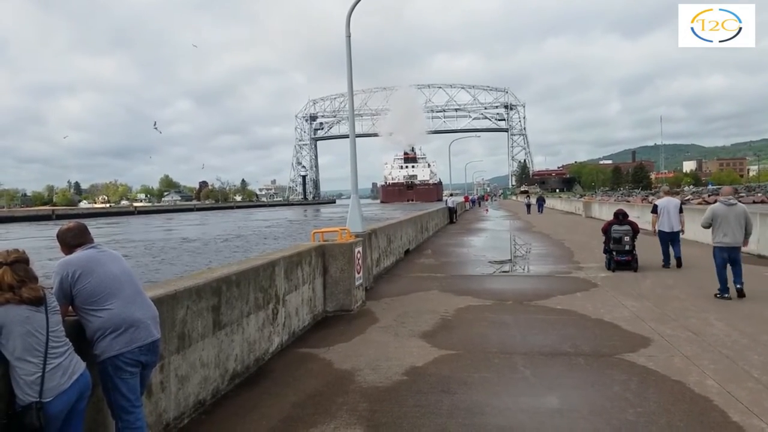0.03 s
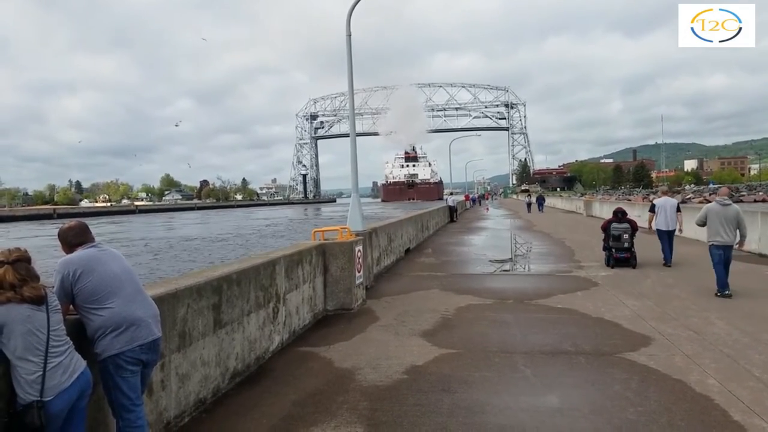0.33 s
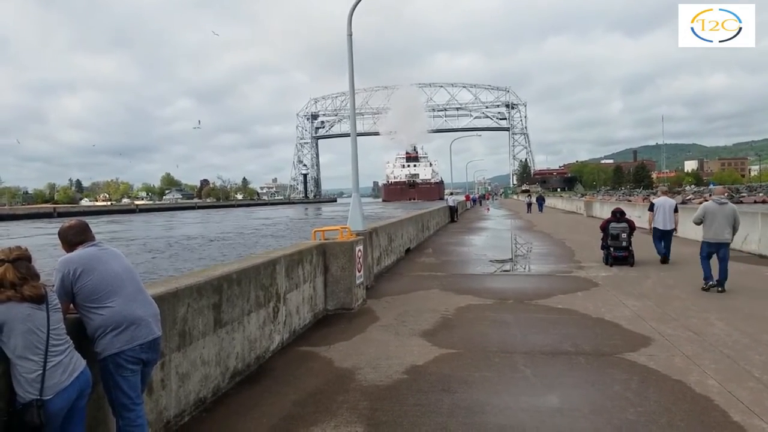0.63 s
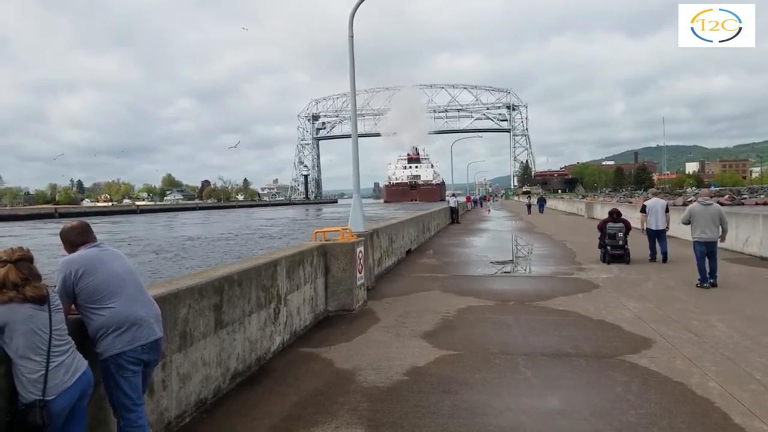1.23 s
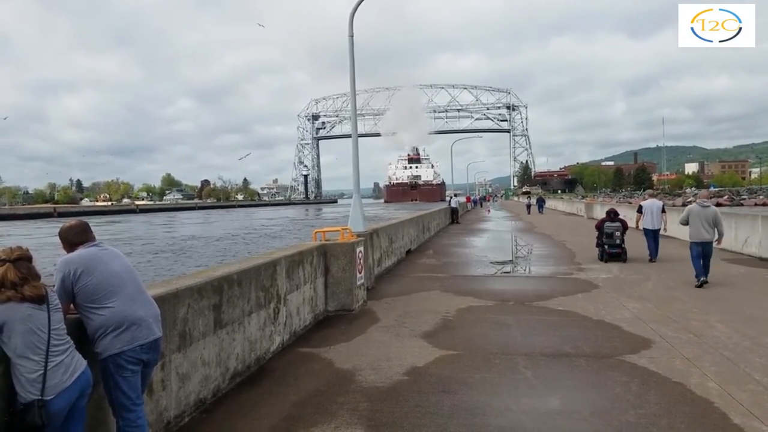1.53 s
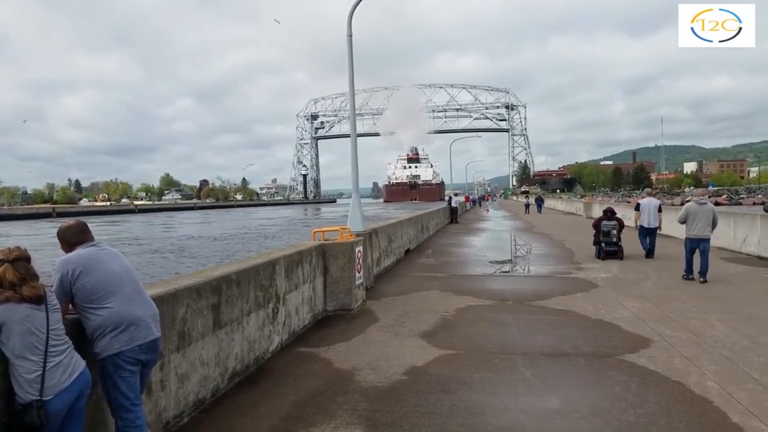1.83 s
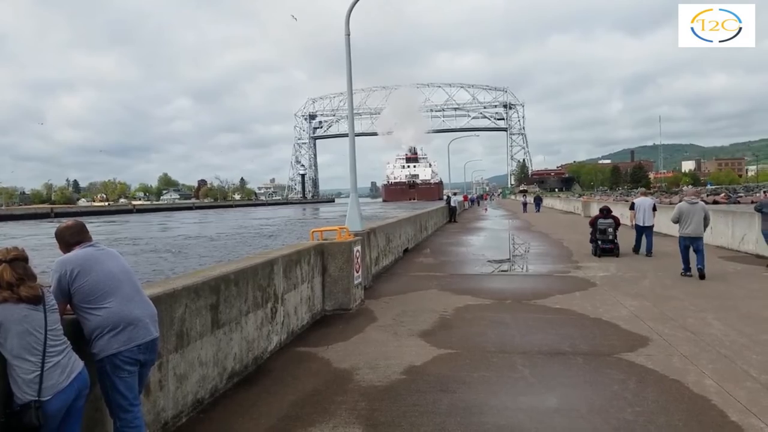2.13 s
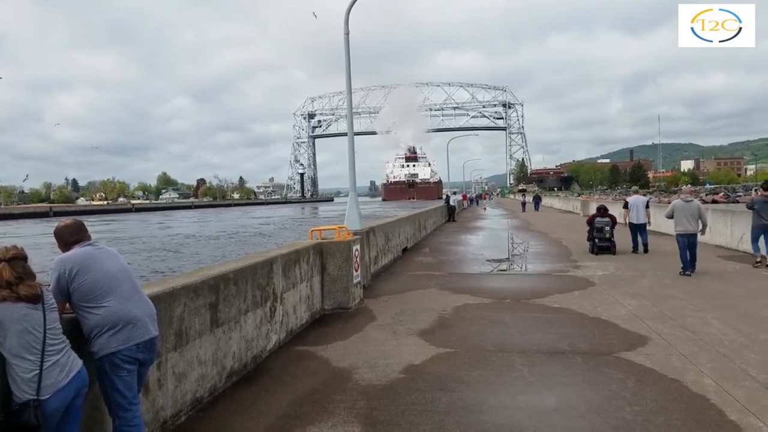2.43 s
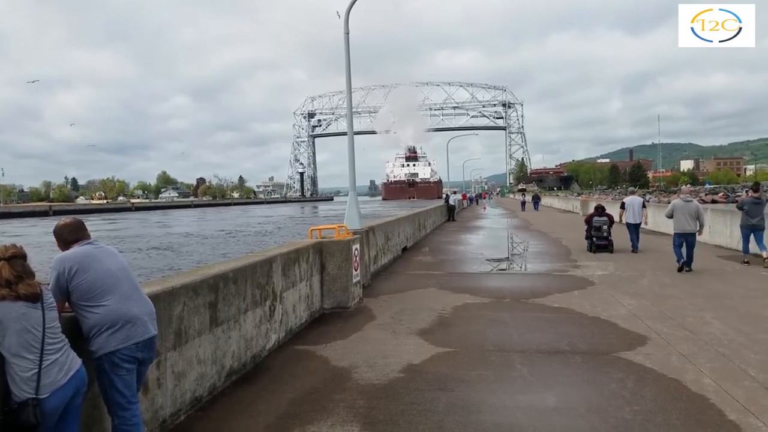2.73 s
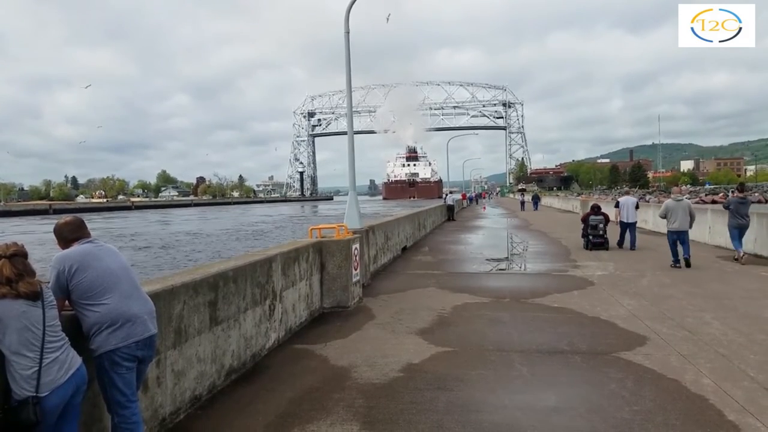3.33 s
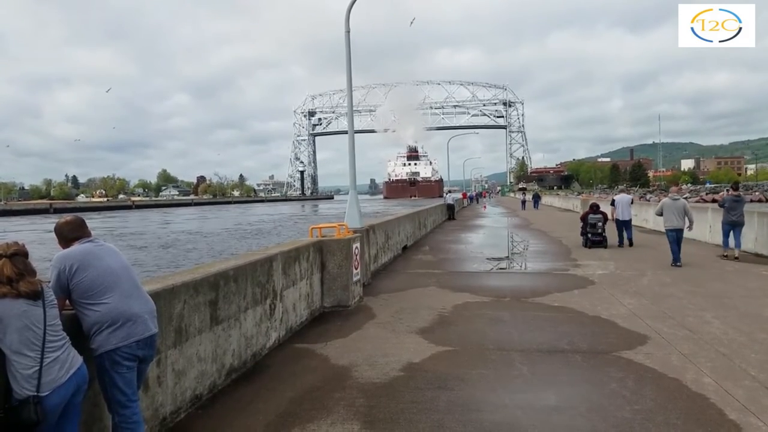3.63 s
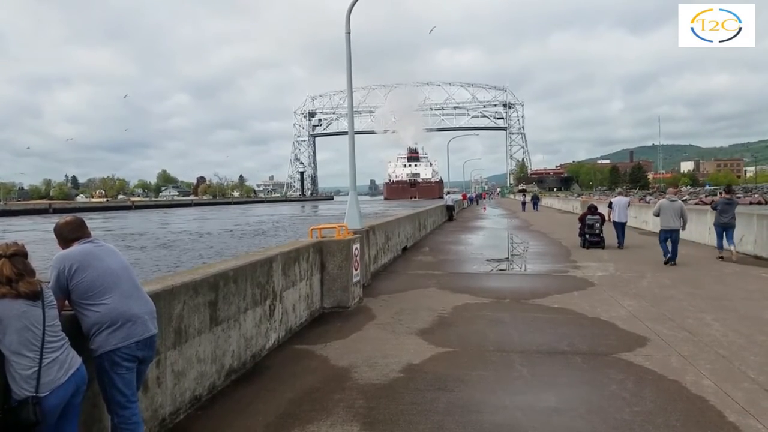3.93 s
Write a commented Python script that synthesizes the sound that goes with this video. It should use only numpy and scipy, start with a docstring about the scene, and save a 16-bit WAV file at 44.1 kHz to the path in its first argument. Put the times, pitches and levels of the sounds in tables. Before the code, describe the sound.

A large ship's horn is the main sound, heard from a canal pier. For the first half second there is only faint engine rumble, open-air wash and the distant echo of an earlier blast. At about 0.5 seconds the horn enters sharply with a loud, brassy chord of several tones. It holds steadily to the end, around 4 seconds, throbbing slightly, with rushing air and reverberation off walls and water.

```python
"""Four air horns sound one long, steady chord across a ship canal, heard from a concrete pier.
Each diaphragm starts sharp and settles; the three lower horns beat and mix into sum tones.
Single partials swell and dip, one throbs; walls and water reverberate. Underneath, from the start:
a ship's engine rumble, open-air wash and the distant echo of an earlier blast."""
import sys
import numpy as np
from scipy import signal
from scipy.fft import rfft, irfft, next_fast_len
from scipy.io import wavfile
from scipy.ndimage import uniform_filter1d, minimum_filter1d, map_coordinates

SR = 44100
rng = np.random.default_rng(int(sys.argv[2]) if len(sys.argv) > 2 else 0)


def file_out(sig):
    """Save sig as 16-bit WAV at sys.argv[1]."""
    # one column per channel
    cols = np.atleast_2d(sig).T
    # limit, then scale
    lim = np.clip(cols, -1, 1)
    pcm = np.round(lim * 32767).astype(np.int16)
    wavfile.write(sys.argv[1], SR, pcm)


N = 176400

# horn: start/s, pitch/Hz, initial sharpness/fraction, settling/s, attack/s
HORNS = {"low": (.54, 258.85, 0.02497, 0.05984, 0.12), "second": (.5, 292.55, 0.03498, 0.0598, 0.044),
         "third": (.485, 298.55, .035, .06, .07), "high": (.449, 355.75, .04, .045, .011)}
# horn: level/dB per harmonic, fundamental first
HARMONICS_DB = { "low": [-29, -21.5, -30, -27, -37.5, -23.5, -35, -39.5, -56.5, -42.5, -60, -59], "second":
                [-38.5, -32, -31.5, -34, -34.5, -40, -44.5, -54.5, -49, -54, -60], "third": [-38, -32,
                -24.5, -37.5, -28, -39.5, -34.5, -40, -51, -48.5, -60, -55.5, -53.5, -60.5, -63.5, -62.5,
                -69.5, -65.5], "high": [-24.5, -27.5, -21.5, -23, -30, -31, -32, -43, -43.5, -49.5, -54,
                -48, -50.5, -57.5, -53.5, -54.5, -58, -68, -57.5, -65, -70, -63, -66.5, -73]}
# level curves of single partials, by (horn, harmonic): t/s, gain/dB
# the high horn's third harmonic throbs about twice a second, as in beating with a nearby sum tone
PARTIAL_LEVELS = {("high", 2): [(.6, 4.5), (1.0, 1), (2.4, 0), (3.55, -6), (3.9, 0)],
                  ("high", 3): [(.47, 2.5), (.56, 5.5), (.7, 4), (.9, -5), (1.05, 7), (1.2, -2), (1.37, 7),
                  (1.5, -5), (1.7, 6.5), (1.95, -2.5), (2.2, 5), (2.45, -3.5), (2.7, 2.5), (2.95, -4.5),
                  (3.2, 0.5), (3.9, -3)], ("high", 4): [(.6, 1), (2.1, -1), (3.1, 0), (3.7, 3.5)],
                  ("high", 6): [(.48, -8.5), (.7, 0), (1.8, -1.5), (3.9, 2)], ("high", 1): [(.47, -5.5),
                  (.56, 0.5), (3.9, 0)], ("low", 3): [(.7, -8), (.95, 0.5), (2.0, 1.5), (3.5, -2),
                  (3.7, -6.5)], ("high", 7): [(.48, -2), (.65, 2.5), (1.2, -4), (2.9, 2), (3.3, -3),
                  (3.8, 3)], ("high", 8): [(.5, 8), (.8, -0.5), (1.1, -7), (2.0, -1), (3.9, 7)],
                  ("high", 12): [(.5, -4.5), (.7, 1), (3.9, 0.5)], ("low", 6): [(.64, -13), (.75, 1.5),
                  (1.6, -1), (2.3, 1.5), (3.0, 1), (3.9, -1.5)], ("low", 1): [(.7, 1), (1.3, 0), (2.8, 1),
                  (3.9, -2)], ("low", 2): [(.7, -3), (1.2, 2.5), (1.95, 2), (2.3, -2), (3.9, -2)],
                  ("low", 4): [(1.2, 4), (1.9, 1), (2.15, -7.5), (2.6, 0), (3.2, 3.5), (3.9, 1)],
                  ("third", 7): [(.7, 4), (2.6, -3), (3.0, -22), (3.9, -8)]}
# combination tones: multiples of (low, second, third), level/dB
SUM_TONES = [((1, 1, 0), -36.5), ((2, 1, 0), -43), ((2, 0, 1), -40), ((0, 2, 1), -37.5), ((0, -1, 4),
             -38.5), ((3, 1, 0), -37), ((3, 0, 1), -29.5), ((1, 2, 1), -40.5), ((2, 0, 2), -45), ((1, 0, 3),
             -42.5), ((0, 1, 3), -46), ((4, 0, 1), -38.5), ((0, 1, 4), -42.5), ((5, 1, 0), -30), ((5, 0, 1),
             -34.5), ((0, 1, 5), -43), ((6, 1, 0), -43.5), ((6, 0, 1), -38), ((0, 1, 6), -38)]
# tones of the far echo: f/Hz, level/dB
ECHO_TONES = [(258.4, -47), (293, -48), (355, -47.5), (586.8, -42), (697.5, -42.5), (753.7, -47.5),
              (861, -47.5), (1044, -45), (1147, -46), (1437, -53), (1497, -47.5), (2094, -58.5)]
# spectral shapes: f/Hz, relative level/dB
RUMBLE_SHAPE = [(10, -41), (31, -22), (48, -7.5), (65, -7.5), (86, 2), (102, -6), (125, -7.5), (180, -11),
                (300, -19.5), (600, -57.5)]  # engine
WASH_SHAPE = [(150, -4), (300, -3.5), (450, -3.5), (800, -3), (1100, -1.5), (1600, -7.5), (2400, -14.5),
              (3200, -30.5), (5000, -40), (8000, -47.5), (15000, -42.5)]  # open air
ROAR_SHAPE = [(150, -41), (260, -6), (430, -11), (560, 3), (660, -11), (900, -4), (1120, -5), (1300, -8.5),
              (1520, -2), (1950, -5), (2250, -14.5), (2600, -8), (3100, -13.5), (3800, -19.5),
              (5400, -19.5), (6800, -30), (8400, -29.5), (8800, -43), (9600, -45.5), (11000, -58),
              (15000, -54.5)]  # air noise and grit of the blast
CLASH_SHAPE = [(300, -26.5), (600, -7.5), (1100, -3), (1550, 4), (1900, -6.5), (2250, 3.5), (2600, -6.5),
               (3500, -14.5), (5300, -8.5), (7000, -16.5), (8500, -11), (9300, -32)]  # dense high sum tones
# treble contour, before centring and scaling: t/s, level/dB
TREBLE_CONTOUR = [(0.5, -35), (0.87, -34.5), (1.02, -37.5), (1.39, -38), (2.02, -35.5), (2.39, -39),
                  (2.85, -37), (3.26, -39.5), (3.95, -38.5)]
# left-right likeness of diffuse sound: f/Hz, coherence/1
COHERENCE = [(60, 1), (1000, 0.75), (2000, 0.6), (4000, 0.49), (8000, 0.21), (14000, .2)]
# stereo balance: f/Hz, left minus right/dB
BALANCE = [(60, 4.5), (75, 2.5), (93, -1), (120, 6.5), (140, 1), (180, 8), (220, -4), (270, 2.5),
           (340, 5.5), (420, -0.5), (530, 3.5), (660, 4), (820, -3), (1010, 0), (1260, 1), (1560, -5),
           (1940, 2.5), (2420, -0.5), (3000, 3), (3730, 12), (4640, 2.5), (5770, -0.5), (7170, 1.5),
           (8910, -0.5)]

T_S = np.arange(N) / SR


def amp(db):
    return 10 ** (np.asarray(db) / 20)


def log_interp(points, hz):
    """(f/Hz, value) points read on a log axis."""
    f_hz, values = np.transpose(points)
    return np.interp(np.log(hz + 1), np.log(f_hz + 1), values)


def rise(start_s, tau_s):
    """Exponential onset, 0 to 1."""
    return 1 - np.exp(-np.maximum(T_S - start_s, 0) / tau_s)


def wobble(knots_per_s):
    """Smooth random curve."""
    grid_s = np.linspace(0, N / SR, 600)
    knots = rng.standard_normal(256)
    return np.interp(T_S, grid_s, map_coordinates(knots, [grid_s * knots_per_s], mode="mirror"))


def filtered(x, response):
    """FFT filter; response takes f/Hz."""
    size = next_fast_len(N + SR // 2)
    return irfft(rfft(x, size) * response(np.fft.rfftfreq(size, 1 / SR)), size)[..., :N]


def diffuse(pair, shape):
    """Two unrelated signals to coloured, partly coherent stereo, rms 1."""
    def mid_side_gains(hz):
        angle_rad = np.arccos(np.clip(log_interp(COHERENCE, hz), -1, 1)) / 2
        return amp(log_interp(shape, hz)) * [np.cos(angle_rad), np.sin(angle_rad)]
    mid, side = filtered(pair, mid_side_gains)
    stereo = np.array([mid + side, mid - side])
    return stereo / np.sqrt(np.mean(stereo ** 2) + 1e-20)


def noise(shape):
    """Diffuse stereo noise, rms 1."""
    return diffuse(rng.standard_normal((2, N)), shape)


def engine_rumble(level_db=-40):
    """Ship's engine: steady low noise."""
    return amp(level_db) * noise(RUMBLE_SHAPE)


def air_wash(level_db=-36):
    """Open air: steady broad noise."""
    return amp(level_db) * noise(WASH_SHAPE)


def far_echo(knots_per_s=12):
    """An earlier blast lingers as horn tones blurred into narrow noise bands."""
    out = np.zeros(N)
    for hz, db in ECHO_TONES:
        blur = wobble(knots_per_s) + 1j * wobble(knots_per_s)
        out += amp(db) * (blur * np.exp(2j * np.pi * hz * T_S)).real
    return out


def air_roar(level_db=-31.5):
    """Rushing air and scattered sound build up with the chord."""
    return amp(level_db) * rise(start_s=.447, tau_s=.07) * noise(ROAR_SHAPE)


def diaphragm(start_s, hz, sharpness, settle_s, attack_s):
    """Phase and envelope of a diaphragm that starts sharp and settles on pitch."""
    age_s = np.maximum(T_S - start_s, 0)
    lead_s = sharpness * settle_s * rise(start_s, settle_s)
    return 2 * np.pi * hz * (age_s + lead_s), rise(start_s, attack_s)


def partial_in_air(phase, hz, db):
    """One tone through turbulent air: higher tones lag and flutter more."""
    khz = hz / 1000
    depth = min(khz ** .51, 1.5)
    lag_rad = 3 * khz ** 2
    flutter_db = 1.1 * depth * wobble(3.995)
    flutter_rad = .25 * depth * wobble(9)
    side_rad = .43 * depth * wobble(1.486) / 2
    phase = phase - lag_rad + flutter_rad
    stereo_phase = np.array([phase + side_rad, phase - side_rad], np.float32)
    return np.sqrt(2) * amp(db + flutter_db) * np.sin(stereo_phase)


def horns(diaphragms, harmonic_delay_s=.0005):
    """Harmonics locked to each diaphragm; higher ones open later, dull to brassy."""
    out = np.zeros((2, N))
    for name, (phase, _) in diaphragms.items():
        start_s, hz, *_, attack_s = HORNS[name]
        for k, db in enumerate(HARMONICS_DB[name], 1):
            curve = PARTIAL_LEVELS.get((name, k))
            gain_db = np.interp(T_S, *np.transpose(curve)) if curve else 0
            envelope = rise(start_s + k * harmonic_delay_s, attack_s)
            out += envelope * partial_in_air(k * phase, k * hz, db + gain_db)
    return out


def sum_tones(diaphragms):
    """The three lower horns are loud enough to mix into combination tones."""
    names = ["low", "second", "third"]
    phases, envelopes = np.transpose([diaphragms[name] for name in names], (1, 0, 2))
    pitches_hz = [HORNS[name][1] for name in names]
    out = np.zeros((2, N))
    for multiples, db in SUM_TONES:
        k = np.array(multiples)
        envelope = envelopes[k != 0].prod(0)
        out += envelope * partial_in_air(k @ phases, k @ pitches_hz, db)
    return out


def wavefront(phase, envelope):
    """A horn's steep front: complex sawtooth, 21 harmonics."""
    phase = phase + .055 * wobble(8)
    return envelope * sum(np.exp(1j * (k * phase).astype(np.float32)) / k for k in range(1, 22))


def clash(diaphragms, cluster_db=-26, grit_db=-28, beating_pair_db=6.5):
    """Wavefronts mix: pairs into high tone clusters, triples into grit between the partials."""
    low, second, third, high = [wavefront(*motion) for motion in diaphragms.values()]
    pairs = (low * (second + third) + amp(beating_pair_db) * second * third).real
    triples = np.gradient(low.imag * third.imag * (second.imag + high.imag))
    clusters = amp(cluster_db) * diffuse(quay_reverb(pairs), CLASH_SHAPE)
    grit = amp(grit_db) * diffuse(quay_reverb(triples), ROAR_SHAPE)
    return clusters + grit


def quay_reverb(x, t60_s=.61):
    """Diffuse reflections off walls and water, one tail per channel."""
    tails = rng.standard_normal((2, SR)) * amp(-60 * T_S[:SR] / t60_s)
    return signal.fftconvolve(np.atleast_2d(x), tails / np.linalg.norm(tails[0]), axes=1)[:, :N]


def shimmer(x, corner_hz=2670, swing=1.14):
    """The treble swells and dulls."""
    times_s, db = np.transpose(TREBLE_CONTOUR)
    gain_db = swing * np.interp(T_S, times_s, db - db.mean())
    treble = filtered(x, lambda hz: 1 - 1 / (1 + (hz / corner_hz) ** 8))
    return x + treble * (amp(gain_db) - 1)


def scene(reverb_db=-12.5, left_lag_s=3.6e-5):
    """Blast over the background; balance varies by band, left arrives slightly late."""
    diaphragms = {name: diaphragm(*row) for name, row in HORNS.items()}
    chord = horns(diaphragms) + sum_tones(diaphragms) + clash(diaphragms)
    blast = shimmer(chord + amp(reverb_db) * quay_reverb(chord) + air_roar())
    mix = blast + far_echo() + engine_rumble() + air_wash()
    sides = np.array([[.5], [-.5]])

    def placement(hz):
        delay = np.exp(-2j * np.pi * hz * sides * left_lag_s)
        return amp(sides * log_interp(BALANCE, hz)) * delay
    return filtered(mix, placement)


def record(dry, knee_db=-11.5, slope=.73, max_lift_db=4, window_s=.04,
           ceiling=.93, hold_s=.004, cutoff_hz=15760):
    """Gain control lifts quiet passages; peak limiter and low-pass follow."""
    power = np.abs(uniform_filter1d(np.mean(dry ** 2, 0), int(window_s * SR)))
    level_db = 10 * np.log10(power + 1e-12)
    lifted = dry * amp(np.clip(slope * (knee_db - level_db), 0, max_lift_db))
    safe_gain = np.minimum(1, ceiling / (np.abs(lifted).max(0) + 1e-9))
    hold = int(hold_s * SR)
    limiter_gain = uniform_filter1d(minimum_filter1d(safe_gain, 2 * hold), hold)
    return filtered(lifted * limiter_gain, lambda hz: hz < cutoff_hz)


dry = scene()
out = record(dry)
file_out(out)
```